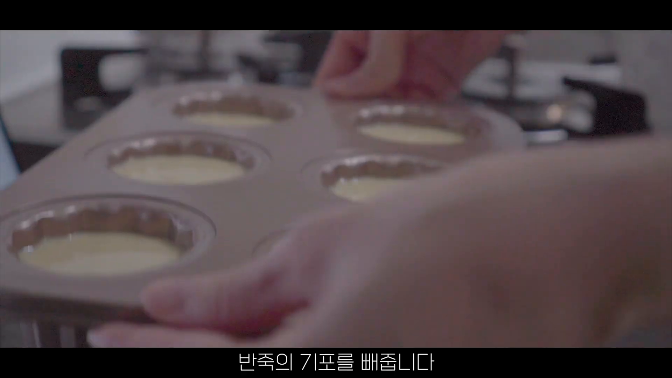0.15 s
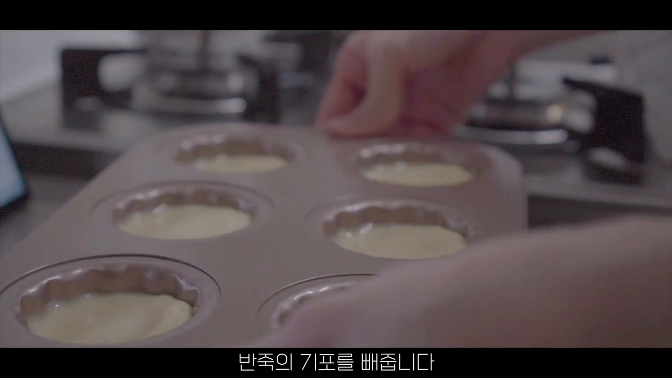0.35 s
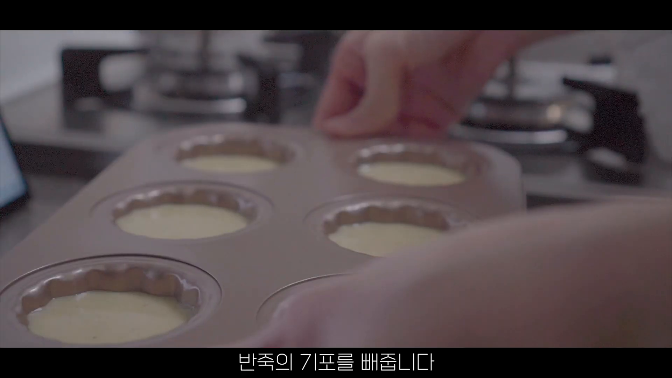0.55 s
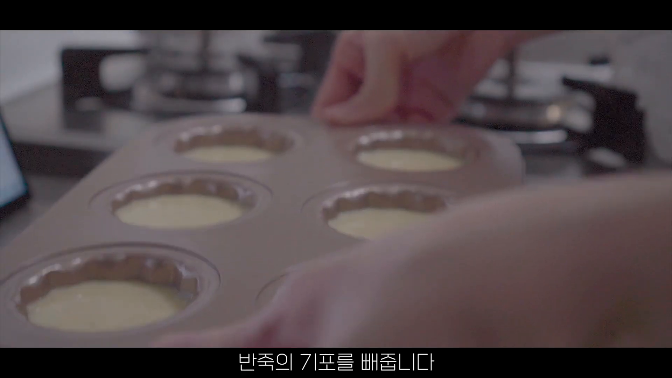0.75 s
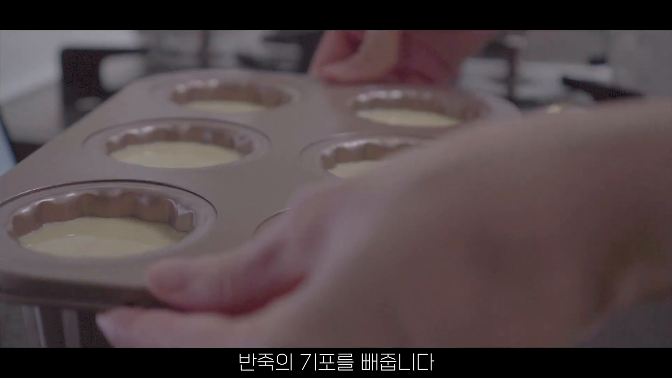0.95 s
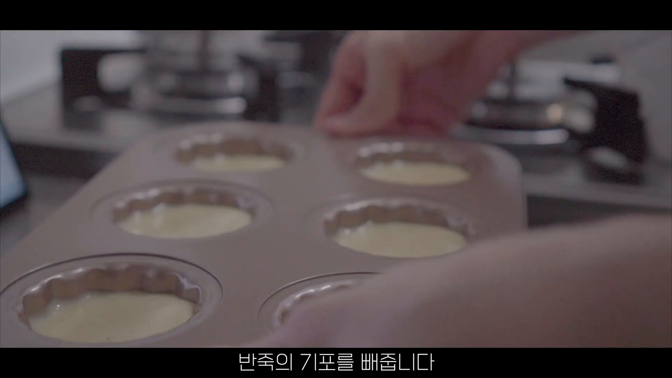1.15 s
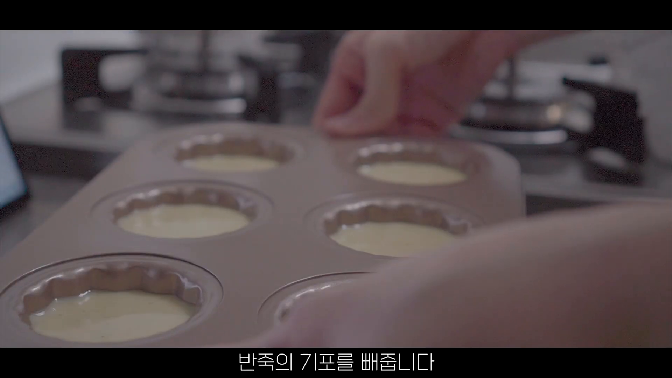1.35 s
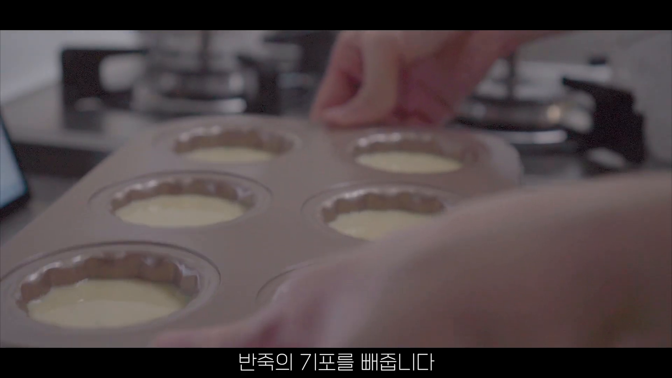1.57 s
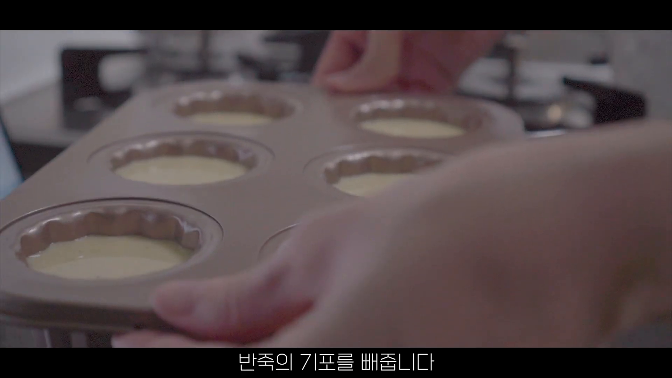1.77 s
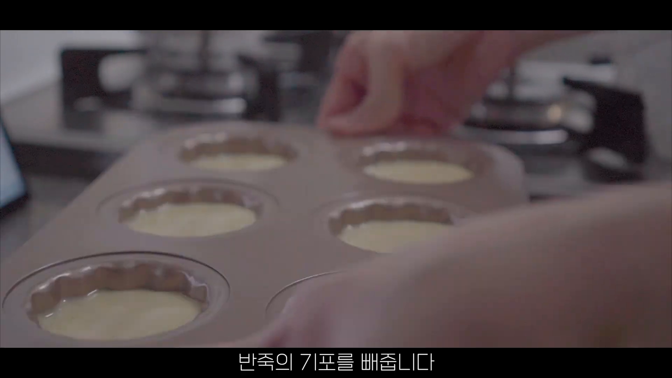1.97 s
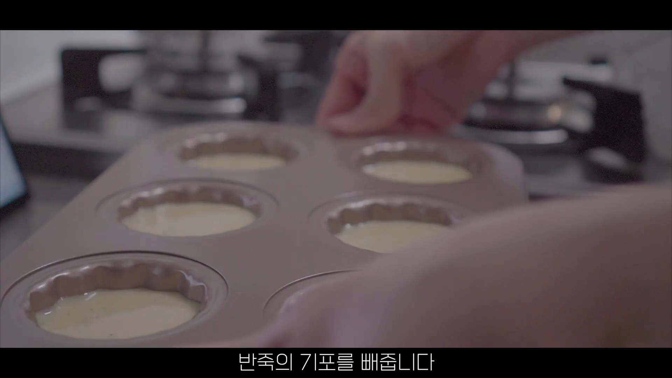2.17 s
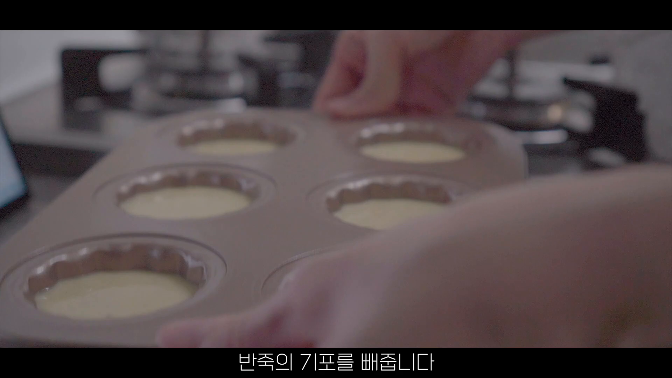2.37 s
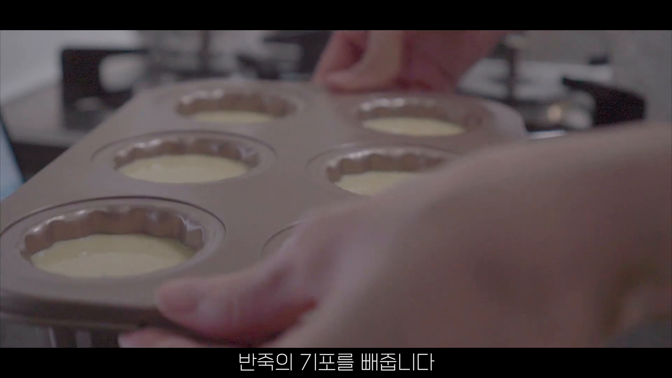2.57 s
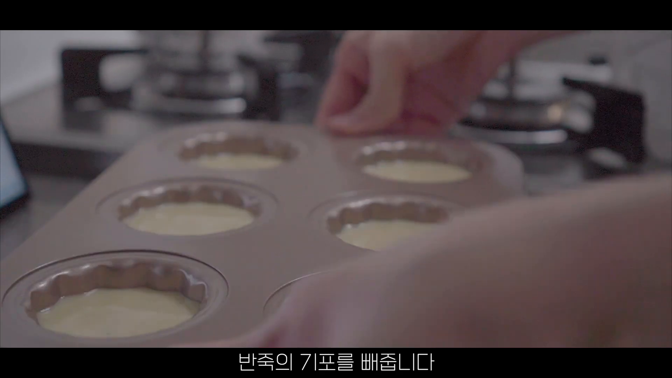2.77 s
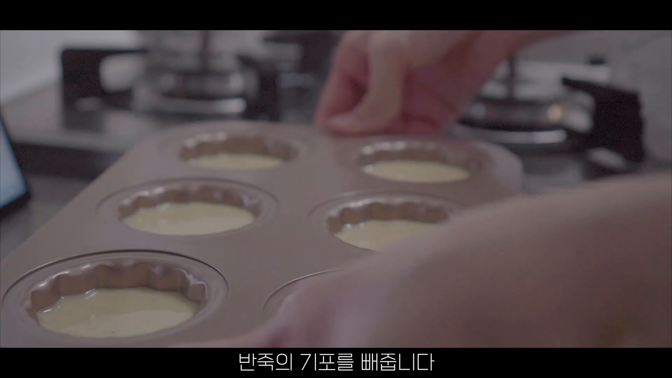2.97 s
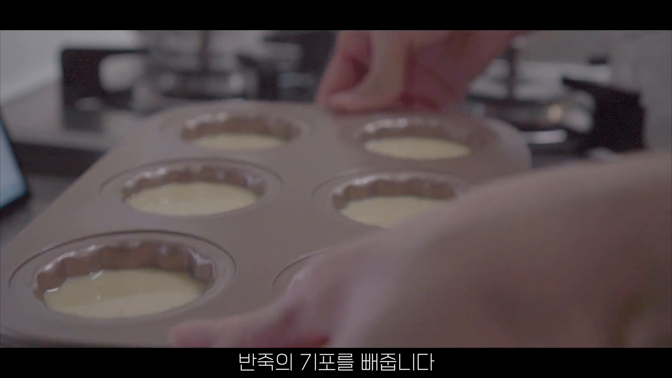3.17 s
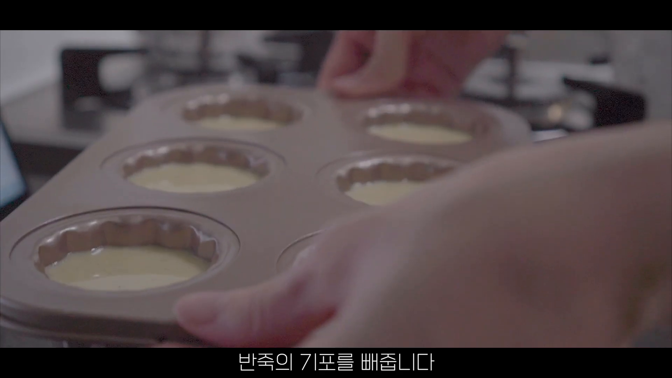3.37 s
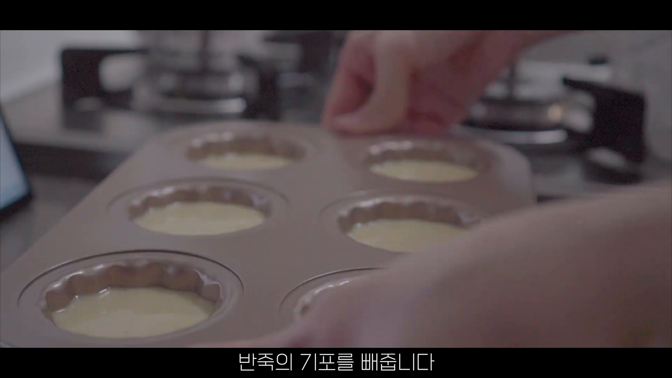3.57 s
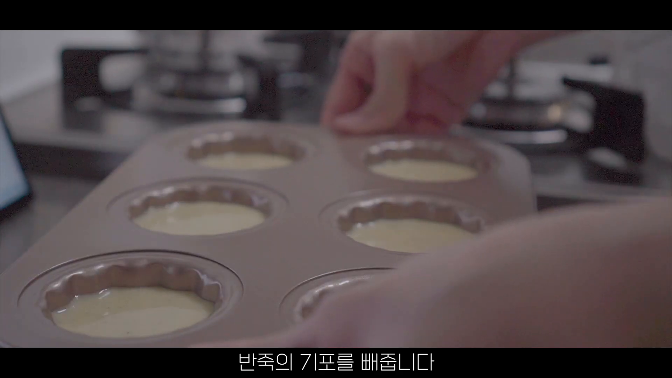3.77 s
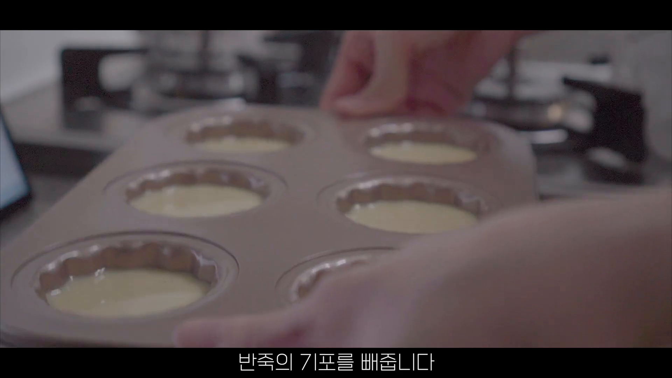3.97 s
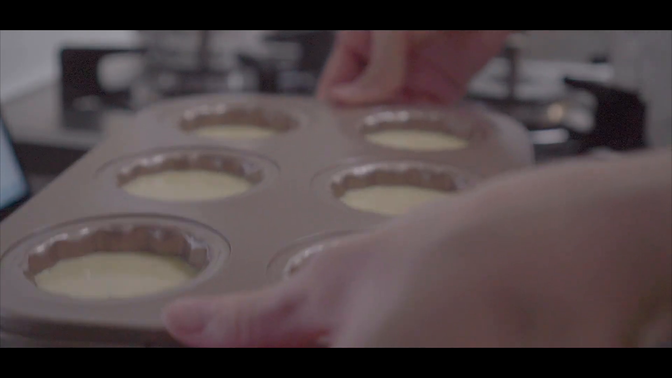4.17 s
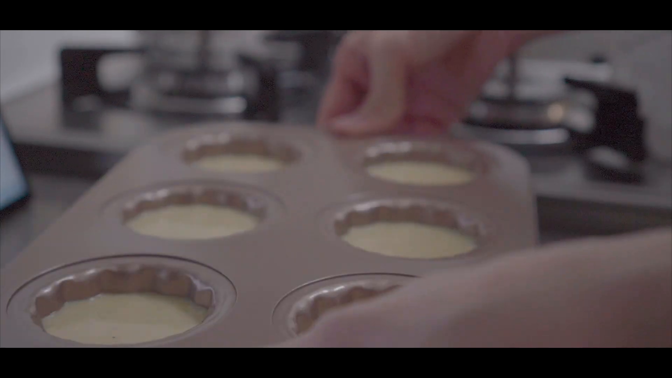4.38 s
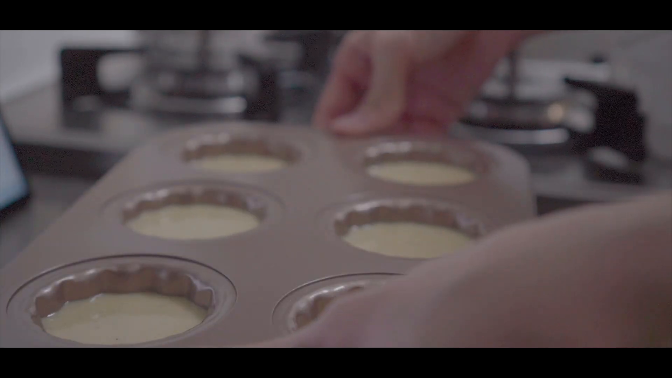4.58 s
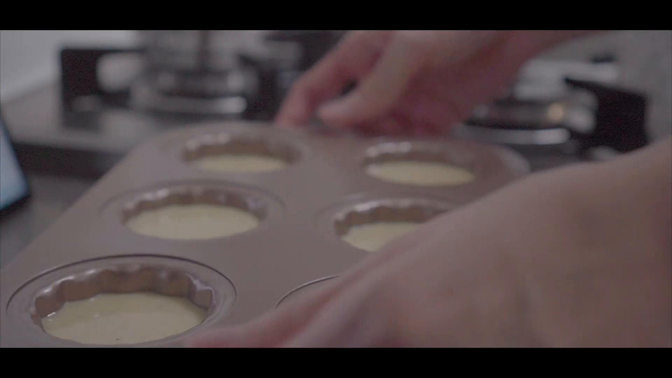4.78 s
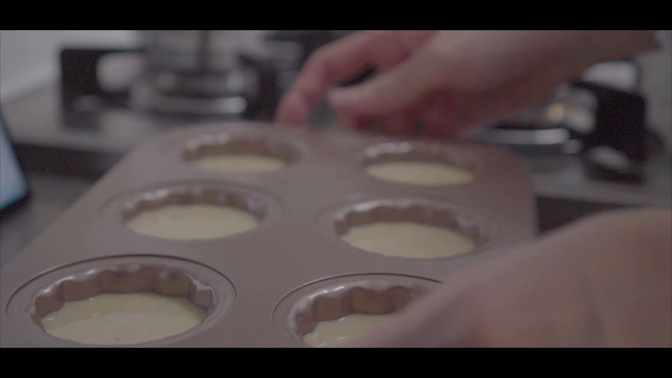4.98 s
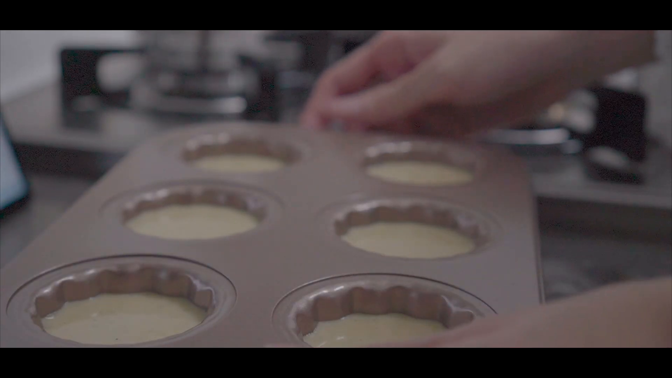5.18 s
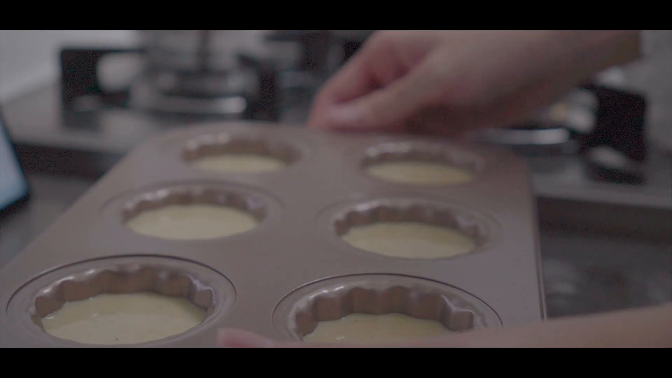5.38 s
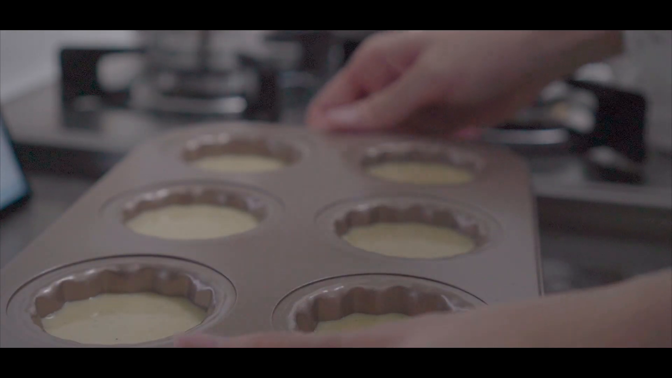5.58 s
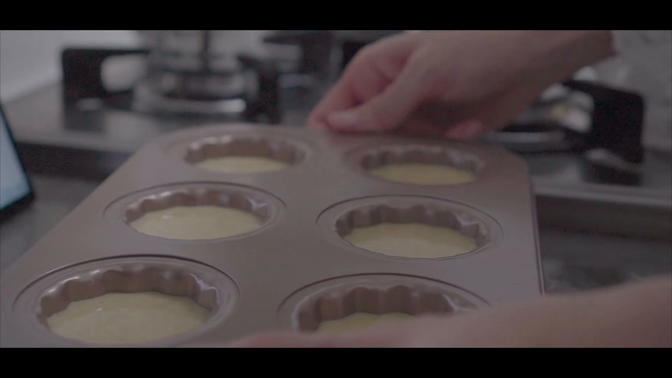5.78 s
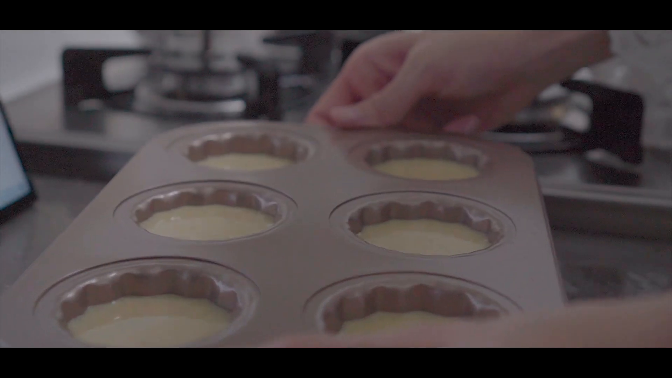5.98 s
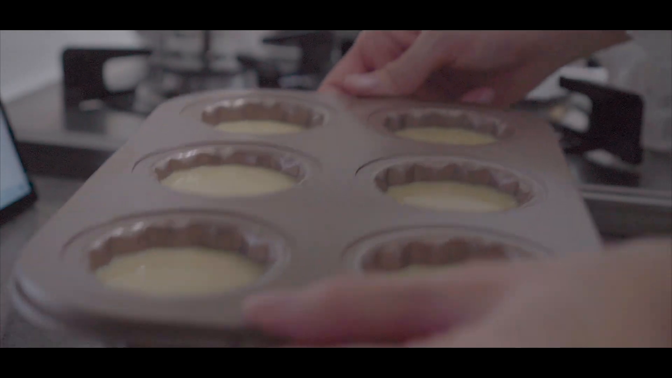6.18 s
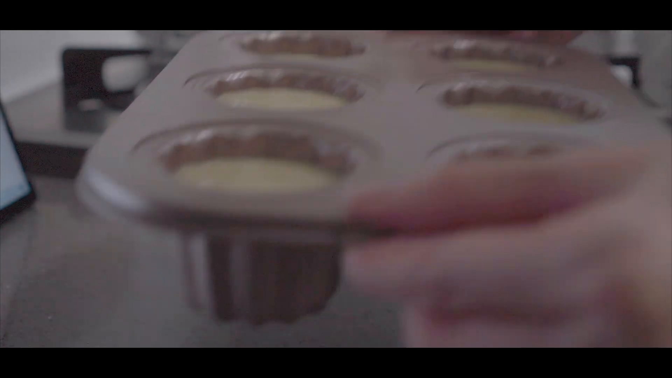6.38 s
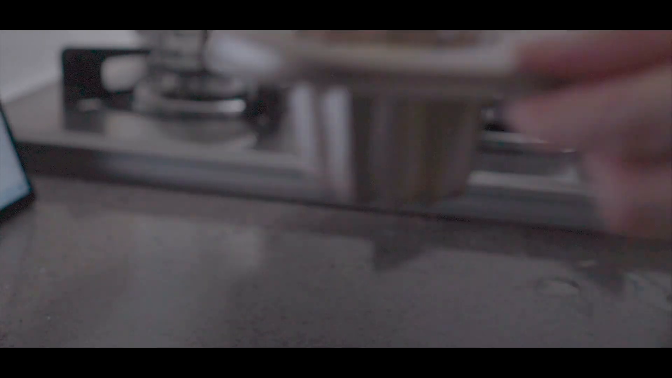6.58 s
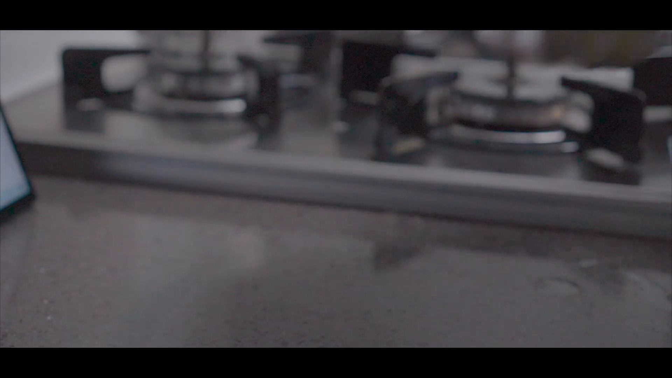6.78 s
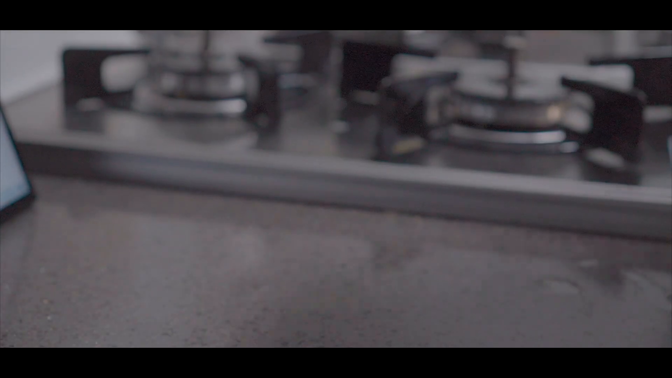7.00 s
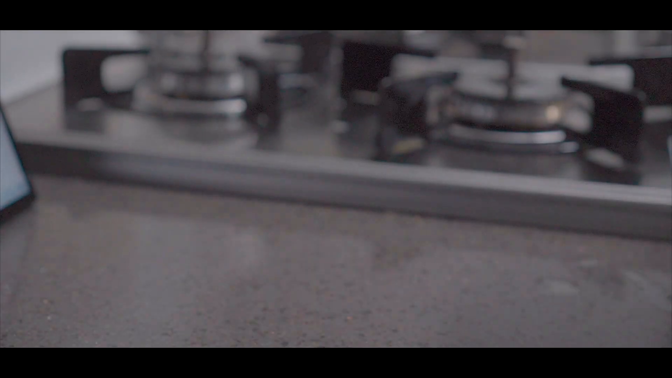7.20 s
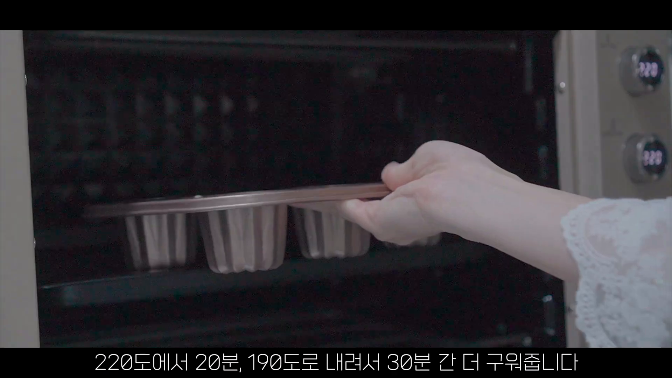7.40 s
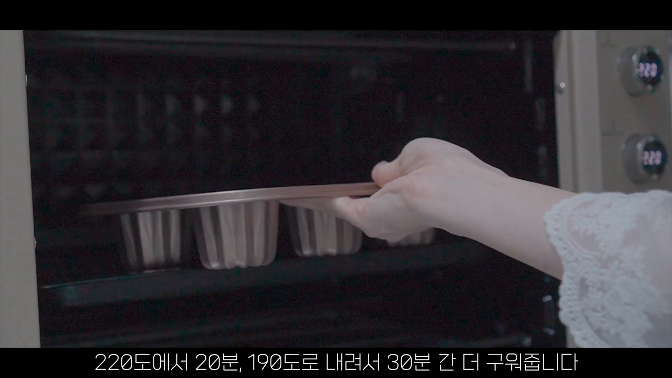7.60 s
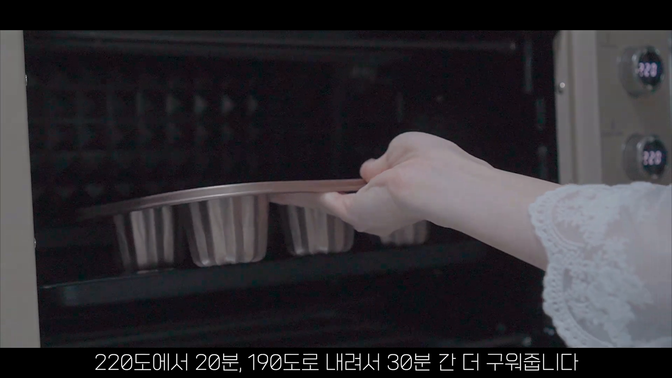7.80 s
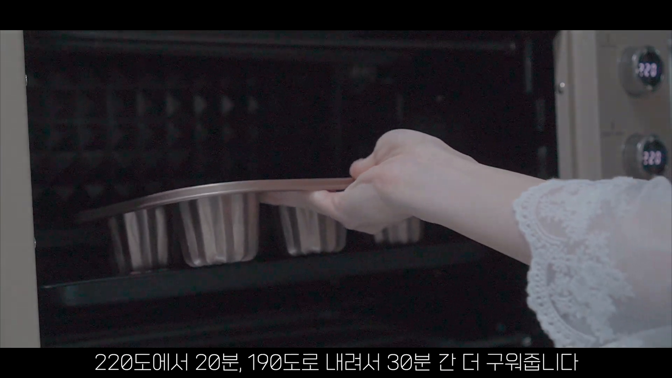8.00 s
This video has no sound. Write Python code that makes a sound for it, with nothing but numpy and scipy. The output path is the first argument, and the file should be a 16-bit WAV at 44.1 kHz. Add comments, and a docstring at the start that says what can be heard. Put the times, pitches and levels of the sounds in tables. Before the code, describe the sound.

Six sharp metallic bangs come a little under a second apart as a filled baking pan is knocked on a kitchen counter, close and slightly distorted, each with a dull thud and a faint lingering ring. A much quieter stretch follows, with fingers brushing the metal, a soft bump and light ticks. Finally an oven fan's hum cuts in and the pan slides and rattles over the wire rack.

```python
"""A soft low rush of room noise stops after an eighth of a second, leaving a quiet kitchen.
A steel muffin pan full of batter is rapped six times on the counter, overloading the microphone:
its cups land milliseconds apart and crack, the counter thuds, the hob beside it rings faintly on.
Fingers brush the pan, nudge it and lift it with a few light ticks.
Last, it scrapes into a humming fan oven, clanks on the wire rack and squeaks once."""
import sys
import numpy as np
from scipy import signal
from scipy.fft import rfft, irfft, next_fast_len
from scipy.io import wavfile
from scipy.ndimage import uniform_filter1d, minimum_filter1d, map_coordinates

SR = 44100
rng = np.random.default_rng(int(sys.argv[2]) if len(sys.argv) > 2 else 0)


def materialize(psi):
    """Save the field psi as 16-bit PCM at rate SR to the path in sys.argv[1].

    A 1-D psi becomes a single channel; in a 2-D psi each row is a channel.
    """
    bounded = np.clip(np.atleast_2d(psi).T, -1, 1)
    quanta = np.round(bounded * 32767).astype(np.int16)
    wavfile.write(sys.argv[1], SR, quanta)


N = 355005
TIME = np.arange(N) / SR
OVEN_START_S = 7.255

# batter-damped pan: freq_hz, level_db, t60_s
PAN_MODES = [(862, -16, 0.17), (1057, -3.5, 0.1), (1154.5, -3, 0.085), (1248, -16.5, 0.095),
             (1534, -16.5, 0.1), (1838, -16, 0.039), (2304, -20.5, 0.057), (2440, -19, 0.061),
             (2843, -22, 0.062), (3690, -23, 0.071), (4290, -21.5, .06), (4700, -28, 0.081)]
# pan on counter: start_s, far_cup_lag_s, rebound_lag_s, edge_db, thud_db, hob_top_db, hob_iron_db
PAN_RAPS = [(0.3385, .012, 0.034, -.5, -1, -4, 5), (1.1141, 0.006, .025, 2, 2, 2, -2),
            (1.9154, 0.0057, 0.021, 2, -1, 8, -11), (2.713, 0.0058, .021, -.5, 1, 0, 0),
            (3.4956, .0048, .023, 0, 2.5, 3, -3), (4.2813, .0051, .018, 1, -3.5, -7, 3.5)]


def amp(db):
    """Decibels to gain."""
    return 10 ** (np.asarray(db) / 20)


def unit(x):
    """Scale to rms 1."""
    return x / np.sqrt(np.mean(x ** 2) + 1e-20)


def along(points, hz):
    """Interpolate (freq_hz, value) points on a log axis."""
    freq_hz, values = np.transpose(points)
    return np.interp(np.log(hz + 1), np.log(freq_hz + 1), values)


def add(track, start_s, sound):
    """Mix a sound in at start_s."""
    part = track[round(start_s * SR):][:len(sound)]
    part += sound[:len(part)]


def wobble(rate_hz):
    """Smooth random curve, rate_hz knots a second."""
    return map_coordinates(rng.standard_normal(int(N * rate_hz / SR) + 4), [TIME * rate_hz])


def noise(spectrum, size=N):
    """Coloured noise, rms 1."""
    n_fft = next_fast_len(size)
    gain = amp(along(spectrum, np.fft.rfftfreq(n_fft, 1 / SR)))
    return unit(irfft(rfft(rng.standard_normal(n_fft)) * gain, n_fft)[:size])


def burst(spectrum, t60_s):
    """Dense overtones struck at once, dying together."""
    return noise(spectrum, size=SR // 2) * amp(-60 * TIME[:SR // 2] / t60_s)


def ring(modes, scatter_db, size=SR // 2):
    """Damped modes, neighbours in opposite phase, levels scattered per blow."""
    t = TIME[:size]
    out = np.zeros(size)
    for k, (hz, db, t60_s) in enumerate(modes):
        envelope = amp(db + scatter_db * rng.standard_normal() - 60 * t / t60_s)
        out += (-1) ** k * envelope * np.sin(2 * np.pi * hz * t)
    return out


def tones(lines, drift_rad, rate_hz=8):
    """Tones with wandering phase."""
    return sum(amp(db) * np.sqrt(2) * np.sin(2 * np.pi * hz * TIME + drift_rad * wobble(rate_hz))
               for hz, db in lines)


def in_room(x, wet_db, build_s=0.0052):
    """Add kitchen reverberation; each frequency dies at its own rate."""
    # room decay: freq_hz, t60_s
    decay = [(100, 0.44), (500, .42), (1500, 0.39), (4500, 0.42), (9000, 0.32), (15000, 0.28)]
    hz, t, bins = signal.stft(rng.standard_normal(SR * 2 // 3), SR, nperseg=256)
    tail = signal.istft(bins * amp(-60 * t / along(decay, hz)[:, None]), SR, nperseg=256)[1]
    tail *= 1 - np.exp(-TIME[:len(tail)] / build_s)
    response = amp(wet_db) * tail / np.linalg.norm(tail)
    response[0] += 1
    return signal.fftconvolve(x, response)[:N]


def room_tone():
    """Still kitchen air and the whine of a distant appliance."""
    # air spectrum: freq_hz, level_db
    air = [(13, -39.5), (22, -7.5), (49, 5), (106, -0.5), (217, -7.5), (286, -1.5), (366, -6), (482, -10.5),
           (539, -16), (585, -4.5), (1170, -20.5), (2390, -27), (4260, -32.5), (13200, -40), (16000, -57.5)]
    # appliance tones: freq_hz, level_db
    whine = [(59, -80.5), (283, -87), (583, -84.5), (759, -88), (5250, -106), (5780, -103)]
    return amp(-71.5) * noise(air) + tones(whine, drift_rad=.4)


def opening_rush():
    """A soft low rush of room noise that stops after an eighth of a second."""
    # rush spectrum: freq_hz, level_db
    spectrum = [(60, 1), (300, -1), (600, -5), (900, -13.5), (2000, -24.5), (7000, -32.5), (15000, -44.5)]
    return amp(-60) * noise(spectrum) * np.interp(TIME, [.115, .135], [1, 0])


def oven():
    """The fan rushes and hums in the steel cavity."""
    # fan and cavity spectrum: freq_hz, level_db
    rush = [(18, -49.5), (30, -15.5), (159, -6.5), (202, 4), (270, -3.5), (404, -2), (456, -12), (552, -3),
            (770, -14), (1210, -9), (2420, -25), (2790, -23.5), (3070, -31.5), (6600, -40.5), (9000, -45),
            (11700, -63), (19800, -120)]
    # motor tones: freq_hz, level_db
    hum = [(119, -64.5), (207, -59), (297, -58.5), (394, -57), (554, -58)]
    fade_in = np.clip((TIME - OVEN_START_S) / .04, 0, 1) ** .5
    eddies = amp(.8 * wobble(12))
    return fade_in * (amp(-46) * noise(rush) * eddies + tones(hum, drift_rad=1.2))


def fingers(fade_s=0.057):
    """Strokes on the pan swell as the fingers press and fade as they let go: 10 dB per swell_s, fade_s."""
    # finger strokes: peak_s, level_db, swell_s, tilt_db_per_octave
    strokes = [(5.62, -77.5, .45, -3), (6.38, -76.5, 0.075, 3), (6.5, -77.5, .08, -0.5),
               (6.96, -80, 0.11, -0.5)]
    # skin on steel: freq_hz, level_db
    skin = [(300, -2.5), (1200, -7), (2500, 1), (4500, -7.5), (8000, -6.5), (15000, -17.5)]
    out = np.zeros(N)
    for peak_s, db, swell_s, tilt in strokes:
        envelope = amp(db - 10 * np.maximum((peak_s - TIME) / swell_s, (TIME - peak_s) / fade_s))
        out += envelope * noise([(hz, level + tilt * np.log2(hz / 2500)) for hz, level in skin])
    return out


def glide(drag_db=-81, rise_db_per_s=600, fall_db_per_s=160, specks_per_s=45, grit_db=5):
    """The pan scrapes into the oven in a few pushes, over grit and with tiny snags."""
    # hand pushes: start_s, length_s, level_db
    pushes = [(7.266, 0.025, -70), (7.35, 0.049, -68.5), (7.42, 0.12, -58), (7.752, 0.023, -63),
              (7.885, .015, -74)]
    # snags: time_s
    snag_times = [7.307, 7.416, 7.654, 7.735, 7.874]
    # sliding steel: freq_hz, level_db
    scrape = [(1500, -49), (3500, -3), (6000, -2), (8700, 4), (11000, -3.5), (14000, 1), (16000, -0.5)]
    drive = np.full(N, amp(drag_db))
    for start_s, length_s, db in pushes:
        before_s = np.maximum(start_s - TIME, 0)
        after_s = np.maximum(TIME - start_s - length_s, 0)
        drive += amp(db - rise_db_per_s * before_s - fall_db_per_s * after_s)
    specks = (rng.random(N) < specks_per_s / SR) * rng.random(N)
    grit = amp(grit_db) * signal.fftconvolve(specks, amp(-60 * TIME[:SR // 20] / 0.016))[:N]
    snags = sum(amp(-60 * np.abs(TIME - time_s) / 0.014) for time_s in snag_times)
    return (drive * (1 + grit) + amp(-61) * snags) * noise(scrape) * (TIME > OVEN_START_S)


def friction():
    """Brushing and scraping share a fine stick-slip grain."""
    grain = unit(amp(1.8 * wobble(300)))
    return (fingers() + glide()) * grain


def nudge(rise_s=0.0014, free_db=-63.5, free_t60_ratio=11.4, cutoff_s=5.978, cutoff_db_per_s=1200):
    """A padded bump reaches only the pan's low modes, which ring briefly, then cut off abruptly."""
    # pan nudged on the counter: start_s, bump_db, ring_db
    nudges = [(5.8704, -42, -51.5)]
    # bump spectrum: freq_hz, level_db
    soft_thud = [(40, -7), (90, -4), (180, -5), (260, -6), (350, 7.5), (480, 5), (750, -15), (1120, -12),
                 (1400, -12.5), (2500, -29.5), (4500, -31), (8000, -78)]
    muffled = [(hz, db - 12 * abs(np.log2(hz / 1100)), t60_s) for hz, db, t60_s in PAN_MODES]
    free = [(hz, db + free_db, t60_s * free_t60_ratio) for hz, db, t60_s in muffled]
    attack = 1 - np.exp(-TIME[:SR // 2] / rise_s)
    out = np.zeros(N)
    for start_s, bump_db, ring_db in nudges:
        bump = amp(bump_db) * burst(soft_thud, t60_s=0.075) + amp(ring_db) * ring(muffled, scatter_db=1.5)
        add(out, start_s, in_room(bump * attack, wet_db=-6))
        add(out, start_s, ring(free, scatter_db=0) * attack)
    return out * amp(-cutoff_db_per_s * np.maximum(TIME - cutoff_s, 0))


def ticks():
    """The pan ticks lightly as it is carried off."""
    # ticks: start_s, level_db
    events = [(6.495, -74), (6.5359, -52.5), (6.965, -72)]
    # tick spectrum: freq_hz, level_db
    spectrum = [(200, -15), (500, 8), (1200, 0.5), (2500, 3), (4000, -4.5), (8000, -14.5), (15000, -33)]
    out = np.zeros(N)
    for start_s, db in events:
        tick = burst(spectrum, t60_s=0.021) + amp(-6) * burst(spectrum, t60_s=0.33)
        add(out, start_s, in_room(amp(db) * tick, wet_db=-7.5))
    return out


def squeak(peak_s=7.7, level_db=-51, pitch_hz=3200):
    """Steel slips on a rack wire."""
    envelope = amp(-60 * np.abs(TIME - peak_s) / 0.024)
    return envelope * tones([(pitch_hz, level_db)], drift_rad=.8, rate_hz=400)


def rack(gap_s=.005, loss_db=3.5, pitch_ratio=.7):
    """Each blow chatters three times on the wires, weaker and duller, favouring modes near its pitch."""
    # pan on rack: start_s, level_db, pitch_hz
    clanks = [(7.299, -33, 1100), (7.5136, -23.5, 3900), (7.585, -23.5, 1310), (7.723, -37.5, 1500),
              (7.878, -38.5, 1270), (7.909, -37.5, 650), (8.010, -31.5, 547)]
    # rack modes: freq_hz, level_db, t60_s
    wire_modes = [(555.2, -3, 0.26), (950, -3.5, 0.17), (1250, -5.5, 0.21), (1704, -7.5, 0.16),
                  (2150, -21.5, 0.17), (2200, -12.5, 0.095), (2670, -22, .16), (2900, -17.5, 0.21),
                  (3300, -11, 0.1), (4000, -14, .12), (4350, -20, .12), (4620, -23, 0.082),
                  (5426, -13, 0.11)]
    # rattle spectrum: freq_hz, level_db
    rattle = [(150, -1), (400, 17), (550, 19), (800, -0.5), (1300, 3.5), (2500, -5), (4000, -2),
              (5700, -6.5), (8800, -8.5), (10500, -22), (16000, -40.5)]
    attack = 1 - np.exp(-TIME[:SR] / 0.0016)
    out = np.zeros(N)
    for start_s, level_db, pitch_hz in clanks:
        blow = np.zeros(SR)
        for k in range(3):
            favour_db = lambda hz: -3 * np.log2(hz / (pitch_hz * pitch_ratio ** k)) ** 2
            modes = [(hz, db + favour_db(hz), t60_s) for hz, db, t60_s in wire_modes]
            wires = amp(-11) * ring(modes, scatter_db=1, size=SR)
            add(wires, 0, amp(-6.5) * burst([(hz, db + favour_db(hz)) for hz, db in rattle], t60_s=0.067))
            add(blow, k * gap_s, amp(level_db - k * loss_db) * wires * attack)
        add(out, start_s, in_room(blow, wet_db=-5.5))
    return out


def hob(lag_s=.005, pair_fade_db_per_s=2.5):
    """Hob and worktop ring on long after the damped pan has stopped."""
    # modes: freq_hz, level_db, t60_s
    sheet_top = [(211.3, -27, .15), (224, -62.5, 1.8)]
    ironwork = [(1109, -72.5, 1.7), (1212, -66, 1.9)]
    beating_pair = [(614, -53, 1.2), (629, -55, 1.1)]
    worktop_sway = [(31.2, -54, 2.4)]
    out = np.zeros(N)
    for start_s, *_, top_db, iron_db in PAN_RAPS:
        pair_db = -pair_fade_db_per_s * start_s  # answers less as the pan drifts over the counter
        parts = [(sheet_top, top_db), (ironwork, iron_db), (beating_pair, pair_db), (worktop_sway, 0)]
        modes = [(hz, db + part_db, t60_s) for part, part_db in parts for hz, db, t60_s in part]
        add(out, start_s + lag_s, ring(modes, scatter_db=1.5, size=SR * 2))
    return out * amp(1.2 * wobble(16))  # loose ironwork wavers


def contacts(last_lag_ratio=1.35, settle_s=.007):
    """The pan lands tilted, rebounds and settles; yields start_s, pan_db, crack_db, counter_db."""
    for start_s, lag_s, rebound_s, edge_db, thud_db, *_ in PAN_RAPS:
        landings = [(0, -11, -13.5, -17.5),  # near cups
                    (lag_s, -14.5, -11.5, -16.5),  # far cups
                    (lag_s * last_lag_ratio, -16, -9, -20.5),  # last cup
                    (rebound_s, -22.5, -23.5, -19.5),
                    (rebound_s + settle_s, -26.5, -24, -22.5)]
        for delay_s, pan_db, crack_db, counter_db in landings:
            yield start_s + delay_s, pan_db, crack_db + edge_db, counter_db + thud_db


def raps():
    """Each contact cracks, rings the pan and thuds on the counter."""
    # counter modes: freq_hz, level_db, t60_s
    upper_modes = [(302.4, -18.5, 0.18), (341, -15, .15), (397.6, -14, 0.17), (452, -19, .15),
                   (515, -20, 0.076), (534, -17.5, 0.12), (575, -20.5, .14), (609, -21, 0.22),
                   (740, -21, 0.045), (839, -18, 0.18)]
    boom_modes = [(61.7, -20, .08), (98, -14.5, .11), (132, -15.5, 0.065), (174, -19, 0.07)]
    # dense overtones of counter and pan: freq_hz, level_db
    counter_thud = [(60, -12), (200, -6), (400, 0), (650, -2), (1200, -12.5), (2500, -35.5), (5000, -68.5)]
    pan_sheet = [(150, -18), (400, 4.5), (1100, 3), (1800, -1.5), (2150, -7.5), (2700, -7.5), (3200, -16),
                 (4200, -16.5), (6000, -24), (10000, -26.5), (16000, -39.5)]
    edge_crack = [(500, -3.5), (1600, 10), (3200, 3.5), (4200, 7.5), (5800, -3), (8000, -5.5), (10000, -19),
                  (11500, -29), (16000, -17.5)]
    rim_sizzle = [(1500, -9.5), (4200, 4.5), (5800, -7), (8000, -4.5), (9300, -8), (10000, 0), (10700, -17),
                  (16000, -27)]
    out = np.zeros(N)
    for start_s, pan_db, crack_db, counter_db in contacts():
        # a new spot each time: random mode polarity (negative frequency flips the sine)
        struck = [(hz * rng.choice([-1, 1]), db, t60_s) for hz, db, t60_s in upper_modes]
        blow = amp(counter_db) * ring(struck, scatter_db=1)
        blow += amp(pan_db - 2) * ring(boom_modes, scatter_db=1)
        blow += amp(counter_db - 14) * burst(counter_thud, t60_s=0.11)
        add(blow, 0, amp(pan_db - 3.5) * ring(PAN_MODES, scatter_db=1.5, size=SR // 3))
        blow += amp(pan_db - 3) * burst(pan_sheet, t60_s=0.068)
        blow += amp(crack_db - 7.5) * burst(edge_crack, t60_s=0.014)
        blow += amp(crack_db - 24) * burst(rim_sizzle, t60_s=0.074)
        add(out, start_s, in_room(blow, wet_db=-17.5))
    return out


def scene():
    """All sources over the room tone, mono."""
    mix = room_tone() + opening_rush() + raps() + hob() + nudge() + ticks()
    mix += rack() + squeak() + friction() + oven()
    return mix[None]


def record(dry, limit=.33, ceiling=.26, cutoff_hz=15800):
    """A fast limiter holds the raps down, soft clipping rounds their peaks, a steep low-pass follows."""
    needed_gain = np.minimum(1, limit / (np.abs(dry) + 1e-9))
    limited = dry * uniform_filter1d(minimum_filter1d(needed_gain, size=90), size=60)
    clipped = limited / (1 + np.abs(limited / ceiling) ** 4) ** (1 / 4)
    n_fft = next_fast_len(N + SR // 2)
    low_pass = 1 / (1 + (np.fft.rfftfreq(n_fft, 1 / SR) / cutoff_hz) ** 200)
    return irfft(rfft(clipped, n_fft) * low_pass, n_fft)[..., :N]


dry = scene()
out = record(dry)
materialize(out)
```